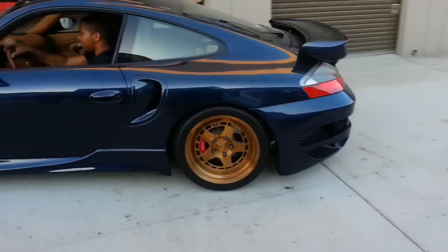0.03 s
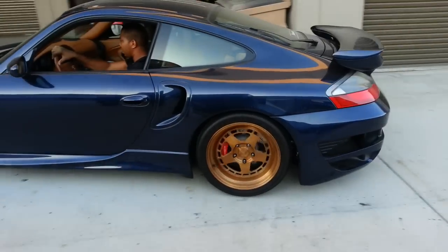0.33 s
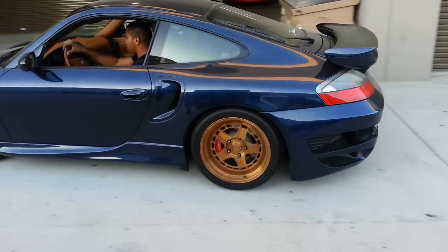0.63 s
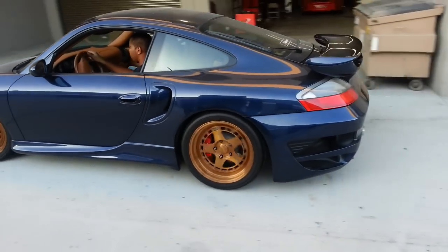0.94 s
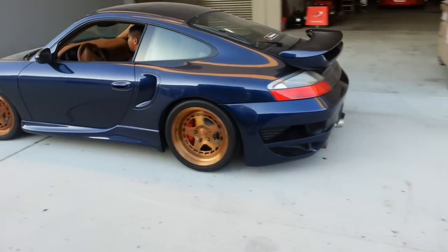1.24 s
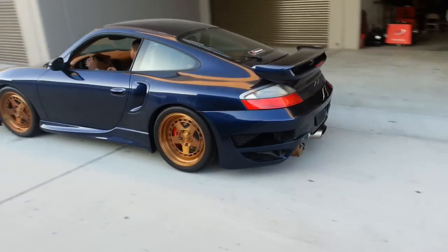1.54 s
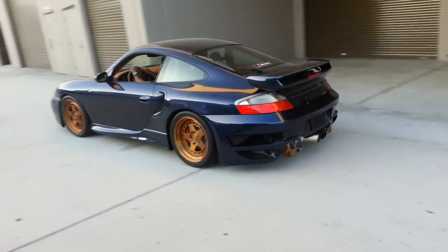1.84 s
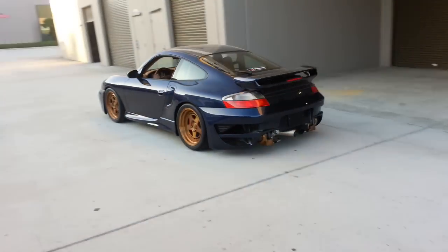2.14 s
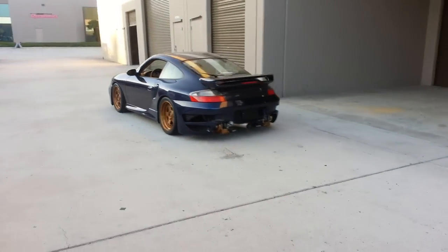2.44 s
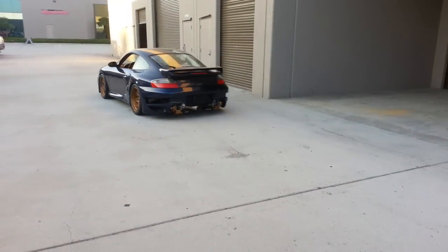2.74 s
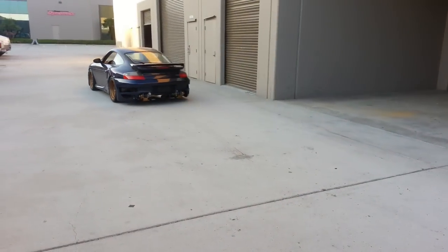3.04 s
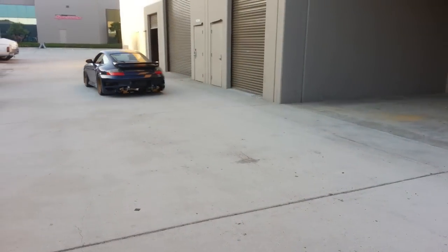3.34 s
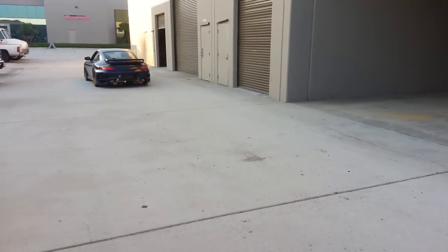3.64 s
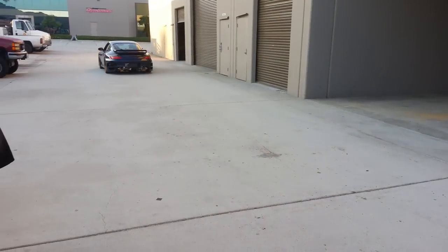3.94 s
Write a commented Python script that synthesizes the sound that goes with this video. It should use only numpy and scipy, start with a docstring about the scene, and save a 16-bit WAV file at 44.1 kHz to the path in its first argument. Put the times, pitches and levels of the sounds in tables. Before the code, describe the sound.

Sports car pulling away with a booming, slightly raspy exhaust that climbs in pitch.

```python
"""A six-cylinder sports car lets in its clutch beside the microphone, sags, then pulls away over concrete.
Its exhaust booms on the lowest orders, lopes with uneven firings and rasps as the tailpipes turn to us.
Each firing throws out a puff of clatter and hiss, sets resonances buzzing and, close up, ticks crisply.
Warehouse walls answer across the lot, more as the car gets farther; three soft bumps touch the low end."""
import sys
import numpy as np
from scipy import signal
from scipy.fft import rfft, irfft, next_fast_len
from scipy.io import wavfile
from scipy.ndimage import minimum_filter1d, map_coordinates

SR = 44100
rng = np.random.default_rng(int(sys.argv[2]) if len(sys.argv) > 2 else 0)


def to_wav(s):
    """Save 16-bit WAV."""
    ch = np.atleast_2d(s).T  # columns
    pcm = np.round(np.clip(ch, -1, 1) * 32767)  # PCM
    wavfile.write(sys.argv[1], SR, pcm.astype(np.int16))


N = 176400

# Engine speed, sagging and then climbing: t/s, firing rate/Hz
FIRING_RATE = [(0.1, 56.34), (0.28, 53.56), (0.76, 45.9), (0.92, 44.82), (1.0, 47.54), (1.2, 55.07),
               (1.5, 62.99), (1.72, 74.2), (1.9, 76.8), (2.07, 85.54), (2.41, 96.33), (2.5, 101.7),
               (2.8, 113.3), (3.12, 127.8), (3.4, 135.8), (3.62, 143.5), (3.87, 144.7), (4.0, 149.4)]
# How far each of the six cylinders departs from the mean firing
CYLINDERS = [0.47, -0.11, 0.36, -0.61, 0.76, -0.27]
# Exhaust boom: t/s, then relative level/dB of orders 1-6 of the firing rate
ORDER_LEVELS = [(0.15, -39, -28, -17, -14.5, -34, -46), (0.75, -36, -28.5, -20.5, -12, -19, -23.5),
                (0.95, -40, -29.5, -24, -9.5, -27, -27), (1.1, -33, -25, -19, -17, -26, -27),
                (1.25, -44, -28.5, -14, -17.5, -27.5, -44), (1.5, -26, -25.5, -15, -19.5, -29, -60),
                (1.75, -30, -24, -10, -43, -65, -71), (2.08, -33, -17, -18.5, -22, -59, -48),
                (2.25, -23.5, -19, -19, -21, -53, -46), (2.5, -36.5, -28, -10, -25.5, -53, -48),
                (2.64, -22, -19.5, -14.5, -40, -50, -44), (2.78, -17, -14.5, -12, -27, -41, -51),
                (2.88, -29.5, -15, -26.5, -42, -59, -29), (3.26, -28, -12, -31, -68, -31.5, -25),
                (3.5, -20.5, -11, -34, -30, -44, -27.5), (3.6, -14.5, -22, -30, -30, -30, -40),
                (3.72, -15, -8.5, -24, -39, -37, -52), (3.98, -16, -13, -37, -52, -61, -36)]
# Surges of the exhaust under load: start/s, end/s, extra boom level/dB
SURGES = [(2.365, 2.605, 6), (2.893, 3.032, 10), (3.038, 3.131, 10), (3.182, 3.313, 8), (3.362, 3.477, 8)]
# Arrival of the boom at the microphone: t/s, lag of left behind right/s
LEFT_LAG = [(1.3, -0.0001), (2.3, -0.00004), (3.2, 0.00016)]
# Lope as the car turns away: t/s, level/dB, share heard from behind (0-1)
LOPE = [(.15, -14.5, 0.16), (1, -17, 0.02), (1.7, -13.5, 0), (2.2, -17, 0.93), (3.1, -21, 1), (4, -17, 1)]
# Exhaust pipe from the side: f/Hz, gain/dB
PIPE_SIDE = [(25, -33), (70, -24), (120, -14), (170, -5.5), (215, 8.5), (270, 0.5), (340, -20.5),
             (430, -50.5), (800, -22), (4000, -110)]
# Exhaust pipe from behind: f/Hz, gain/dB
PIPE_REAR = [(25, -23), (70, -25), (130, -16), (220, 5), (290, 5), (365, -6), (450, -19), (800, -43),
             (4000, -110)]
# Midrange at the microphone: t/s, relative rasp level/dB, relative clatter level/dB
MID_LEVELS = [(0.15, -38.5, -32), (0.8, -27.5, -32.5), (1.68, -31, -30.5), (2.4, -22.5, -29.5),
              (3.45, -21, -24), (3.6, -22.5, -24), (4.0, -42, -26)]
# Spectrum of the exhaust rasp: f/Hz, gain/dB
RASP_SPECTRUM = [(250, -49.5), (430, -5), (500, -4), (590, 3), (670, -7), (770, 5.5), (850, -5),
                 (960, -8.5), (1250, -7), (2000, -37), (9000, -87)]
# Spectrum of the mechanical clatter: f/Hz, gain/dB
CLATTER_SPECTRUM = [(350, -18), (600, 11), (1000, 7.5), (1450, 8.5), (1650, 2.5), (1900, 7.5), (2500, -8.5),
                    (3200, -18), (9000, -50)]
# Treble at the microphone: t/s, relative spray level/dB, relative hiss level/dB
TREBLE_LEVELS = [(0.15, -36, -36.5), (1.1, -31, -27.5), (2.17, -28.5, -24.5), (2.32, -34.5, -28.5),
                 (2.55, -28.5, -27), (2.62, -30, -27.5), (2.88, -30, -26.5), (3.33, -33, -28.5),
                 (3.45, -33.5, -31.5), (4.0, -35, -36.5)]
# Broad spray of gas: f/Hz, gain/dB
SPRAY_SPECTRUM = [(1200, -22), (2300, 1.5), (4200, -1.5), (8000, -3.5), (10000, -8.5), (14500, -15)]
# Spray in the stereo image: f/Hz, left minus right/dB
SPRAY_PAN = [(2000, 10.5), (2900, -2.5), (4300, 3), (6000, -0.5), (8500, 3), (11000, 3.5), (14000, -2)]
# Narrow ringing hiss: f/Hz, gain/dB
HISS_SPECTRUM = [(4000, -15), (5600, -1.5), (6250, 8.5), (6700, 13), (7200, 9.5), (7900, -2),
                 (12000, -42.5)]
# Hiss in the stereo image: t/s, left minus right/dB
HISS_PAN = [(0, -36), (1.8, -17), (2.7, -14.5), (4, -17.5)]
# Resonances that the firings set buzzing: start/s, end/s, f/Hz, width/Hz, level/dB
BUZZES = [(0.88, 1.302, 1640, 350, -29.5), (0.96, 2.126, 2210, 356, -29), (1.281, 2.045, 1466, 148, -28),
          (2.083, 2.377, 2874, 600, -27), (2.307, 2.606, 900, 147.9, -24.5), (2.597, 3.025, 850, 59, -27),
          (2.57, 2.762, 3820, 701, -27), (2.608, 2.76, 12440, 2985, -30.5)]
# Spectrum of the ticks and snaps: f/Hz, gain/dB
TICK_SPECTRUM = [(2000, -25), (5000, -6), (7500, 1), (10000, -2), (12000, 0), (14500, -4)]
# Ticking, fading towards the end: t/s, level/dB
TICK_LEVEL = [(0.15, -34.5), (0.8, -33.5), (2.1, -34), (2.4, -37.5), (2.85, -40), (3.3, -33), (3.7, -52)]
# Sharp snaps close by: t/s, level/dB
SNAPS = [(1.102, -24), (1.14, -25), (1.773, -22), (1.827, -19), (1.854, -31), (1.957, -15)]
# Dull low bumps: t/s, level/dB
BUMPS = [(2.73, -28), (3.04, -26), (3.37, -25)]
# Echo of the warehouse walls: f/Hz, time to fall 60 dB/s
WALL_DECAY = [(150, 0.22), (1500, 0.12), (10000, 0.087)]
# Echo as the car leaves: t/s, level over the direct sound/dB, before each layer's offset
ECHO_LEVEL = [(0, -10.5), (2, -9), (3, -3.5), (4, -4.5)]


def boom(turn, flutter_db, drift_rad, smear_rad, level_db):
    """Low exhaust orders swell in turn as they cross the pipe's resonance, which delays the higher ones."""
    lag_cycles = np.array([[.5], [-.5]]) * curves(LEFT_LAG)[0] * curves(FIRING_RATE)[0]
    turn = turn - lag_cycles
    tone = 0
    for order, db in enumerate(curves(ORDER_LEVELS), 1):
        gain = amp(db + flutter_db * wobble(21.95))
        phase = 2 * np.pi * order * turn - smear_rad * order ** 2  # the delay rounds the drone
        tone = tone + gain * np.sin(phase + drift_rad * wobble(20.73))
    return amp(level_db + surge()) * tone * pan(db=1.83)


def surge(attack_s=0.01, release_s=0.035):
    """Extra exhaust level in dB under load: each surge opens abruptly and eases off."""
    t = np.arange(N) / SR
    return sum(db * np.clip(np.minimum((t - start) / attack_s, (end - t) / release_s), 0, 1)
               for start, end, db in SURGES)


def lope(turn):
    """Uneven firings ring the pipe, which sounds higher with the microphone behind it."""
    db, rear = curves(LOPE)
    rear = np.clip(rear, 0, 1)
    beat = pulses(turn, mean=0, uneven=0.43, scatter=0.32)
    pipe = np.sqrt(1 - rear) * colour(beat, PIPE_SIDE) + np.sqrt(rear) * colour(beat, PIPE_REAR)
    return amp(db) * pipe * pan(db=0.5)


def rasp(turn):
    """The sharp edge of the exhaust pulses, left of centre."""
    beat = pulses(turn, mean=0.32, uneven=0.44, scatter=0.46)
    return amp(curves(MID_LEVELS)[0] - 6.5 + 0.66 * surge()) * colour(beat, RASP_SPECTRUM) * pan(db=6.0)


def clatter(turn):
    """Mechanical rattle in step with the firings."""
    noise = puffs(turn, decay_s=0.0016, uneven_db=5.5, scatter_db=1.5, steady=0.55, spread=0.58)
    return amp(curves(MID_LEVELS)[1] + 1.5) * colour(noise, CLATTER_SPECTRUM) * pan(db=1.5)


def hiss(turn):
    """Gas spits at each firing: a broad, wide spray and a narrow ringing hiss on the right."""
    spray_db, hiss_db = curves(TREBLE_LEVELS)
    spray = puffs(turn, decay_s=0.0032, uneven_db=-5.0, scatter_db=7.0, steady=1.0, spread=1.0)
    spray = colour(spray, SPRAY_SPECTRUM)
    spray = np.array([colour(channel, [(hz, side * db / 2) for hz, db in SPRAY_PAN])
                      for channel, side in zip(spray, (1, -1))])
    ring = puffs(turn, decay_s=0.0052, uneven_db=4.5, scatter_db=2.0, steady=0.11, spread=0.75)
    ring = colour(ring, HISS_SPECTRUM) * pan(curves(HISS_PAN)[0])
    return amp(spray_db + 7.0) * spray + amp(hiss_db - 1.5) * ring


def buzzes(turn):
    """Each resonance swells and fades, pulsing with the firings."""
    t, out = np.arange(N) / SR, 0
    for start, end, hz, width, db in BUZZES:
        noise = puffs(turn, decay_s=0.0025, uneven_db=-2.0, scatter_db=1.0, steady=0, spread=0.44)
        b, a = signal.iirpeak(hz, hz / (1.5 * width), SR)  # two passes narrow it to about the width
        ring = unit(signal.lfilter(b, a, signal.lfilter(b, a, noise)))
        progress = np.clip((t - start) / (end - start), 0, 1)
        swell = np.abs(np.sin(np.pi * progress)) ** .5
        out = out + amp(db) * swell * ring
    return out


def ticks(turn, snap_decay_s=0.005):
    """A crisp, dry tick at each firing while the engine is near the microphone, and a few sharper snaps."""
    t = np.arange(N) / SR
    train = puffs(turn, decay_s=0.0019, uneven_db=7.5, scatter_db=2.0, steady=0.039, spread=1.0)
    flare = sum(amp(db) * (t > s) * np.exp(-np.abs(t - s) / snap_decay_s) for s, db in SNAPS)
    snaps = flare * colour(rng.standard_normal((2, N)), TICK_SPECTRUM)
    return amp(curves(TICK_LEVEL)[0]) * colour(train, TICK_SPECTRUM) + snaps


def bumps(half_length_s=0.0078):
    """Soft, dull bumps low in the spectrum."""
    t = np.arange(N) / SR
    shape = sum(amp(db) * np.exp(-((t - s) / half_length_s) ** 2) for s, db in BUMPS)
    low_band = signal.butter(2, (35, 100), "band", fs=SR, output="sos")
    return shape * unit(signal.sosfilt(low_band, rng.standard_normal(N)))


def dull_top(x, cutoff_hz=10200, crossfade_s=(3.13, 4.3)):
    """The highest hiss fades out towards the end, leaving a duller sound."""
    dull = signal.sosfiltfilt(signal.butter(2, cutoff_hz, fs=SR, output="sos"), x)
    return x + (dull - x) * np.interp(np.arange(N) / SR, crossfade_s, (0, 1))


def walls(x, offset_db=0, channels=2):
    """The warehouses answer, more as the car leaves; channels=1 gives both sides the same echo."""
    hz, t, spectrum = signal.stft(rng.standard_normal((channels, SR // 2)), SR, nperseg=256)
    decay = amp(-60 * t / along(WALL_DECAY, hz)[:, None])
    tail = signal.istft(spectrum * decay, SR, nperseg=256)[1]
    echo = signal.fftconvolve(x, tail / np.linalg.norm(tail[0]), axes=1)[:, :N]
    wet = amp(curves(ECHO_LEVEL)[0] + offset_db)
    return (x + wet * echo) / np.sqrt(1 + wet ** 2)


def pulses(turn, mean, uneven, scatter):
    """One pulse per firing, sized by its cylinder and by chance."""
    at = np.flatnonzero(np.diff(np.floor(turn)))
    x = np.zeros(N)
    x[at] = mean + uneven * np.resize(CYLINDERS, len(at)) + scatter * rng.standard_normal(SR)[:len(at)]
    return x / np.sqrt(np.gradient(turn))  # equal power at any engine speed


def puffs(turn, decay_s, uneven_db, scatter_db, steady, spread):
    """Stereo noise that flares at each firing and dies away over a steady floor."""
    firing, part = np.divmod(turn + 0.725, 1)  # leads the exhaust pulse by this share of an interval
    age = part / (np.gradient(turn) * SR)
    size_db = uneven_db * np.roll(np.resize(CYLINDERS, SR), 1) + scatter_db * rng.standard_normal(SR)
    size = amp(size_db)[firing.astype(int)]
    flare = np.exp(-age / decay_s) * (1 - np.exp(-age / 0.0015))
    mid, side = rng.standard_normal((2, N))
    return (steady + size * flare) * np.array([mid + spread * side, mid - spread * side])


def colour(x, points):
    """Causal filter with the gain of the (f/Hz, gain/dB) points; output at rms 1."""
    size = 2 * next_fast_len(N // 2 + SR // 4)
    cepstrum = irfft(np.log(amp(along(points, np.fft.rfftfreq(size, 1 / SR)))))
    cepstrum[1:size // 2] *= 2  # fold to minimum phase
    cepstrum[size // 2 + 1:] = 0
    return unit(irfft(rfft(x, size) * np.exp(rfft(cepstrum)))[..., :N])


def amp(db):
    """Decibels to gain."""
    return 10 ** (np.asarray(db) / 20)


def unit(x):
    """Scale to rms 1."""
    return x / np.sqrt(np.mean(x ** 2) + 1e-20)


def along(points, hz):
    """Interpolate (f/Hz, value) points on a log frequency axis."""
    f, values = np.transpose(points)
    return np.interp(np.log(hz + 1), np.log(f + 1), values)


def curves(rows):
    """One value per sample for each column after the time."""
    times, *columns = np.transpose(rows)
    return [np.interp(np.arange(N) / SR, times, column) for column in columns]


def wobble(rate):
    """A smooth random curve, rate knots a second."""
    return map_coordinates(rng.standard_normal(N // 100), [np.arange(N) * rate / SR], mode="wrap")


def pan(db):
    """Left and right gains for a level difference; positive is left."""
    return amp(np.array([[.5], [-.5]]) * db)


def scene():
    """The car from a fixed spot on the lot: one engine speed drives all its layers."""
    turn = np.cumsum(curves(FIRING_RATE)[0]) / SR  # firings so far
    drone = boom(turn, flutter_db=1.86, drift_rad=0.13, smear_rad=1.45, level_db=2.5)
    drone = walls(drone, offset_db=-9, channels=1)
    body = walls(lope(turn) + rasp(turn))
    noise = walls(clatter(turn) + dull_top(hiss(turn)) + buzzes(turn))
    return drone + body + noise + ticks(turn) + bumps()


def record(dry, fade_s=(0.077, 0.16), ceiling=0.56, hold_s=0.012, response_s=0.0054, top_hz=14900):
    """Fade-in, a bass-keyed limiter that ducks everything under loud surges, overload and a band limit."""
    x = dry * np.interp(np.arange(N) / SR, fade_s, (0, 1))
    bass = signal.sosfiltfilt(signal.butter(2, 1000, fs=SR, output="sos"), x.mean(0))
    hold = int(hold_s * SR)
    cut = 1 - minimum_filter1d(ceiling / np.maximum(np.abs(bass), ceiling), hold, origin=(hold - 1) // 2)
    pole = np.exp(-1 / (response_s * SR))
    x = x * (1 - signal.lfilter([1 - pole], [1, -pole], cut))
    x = x / (1 + np.abs(x) ** 8) ** (1 / 8)  # soft overload
    size = next_fast_len(N + SR // 2)
    passband = np.fft.rfftfreq(size, 1 / SR) < top_hz
    return irfft(rfft(x, size) * passband, size)[:, :N]


dry = scene()
out = record(dry)
to_wav(out)
```